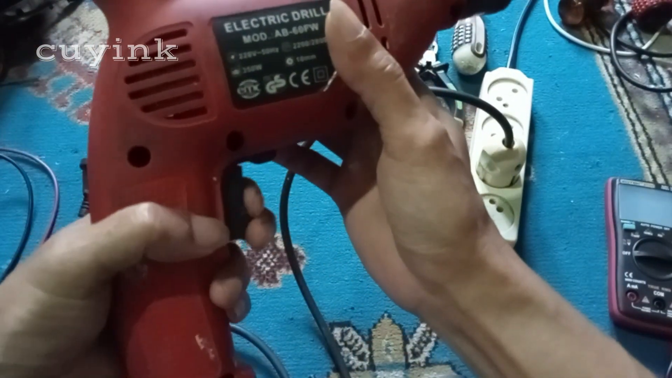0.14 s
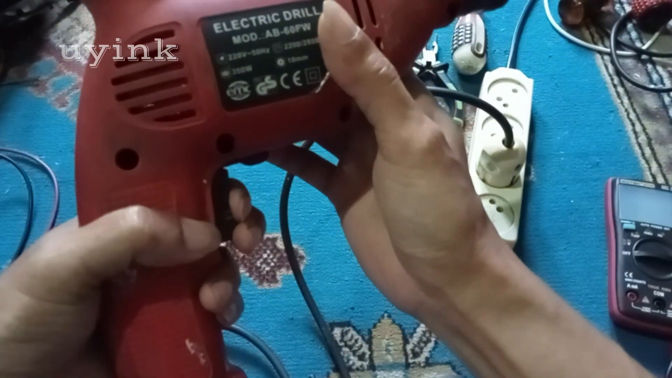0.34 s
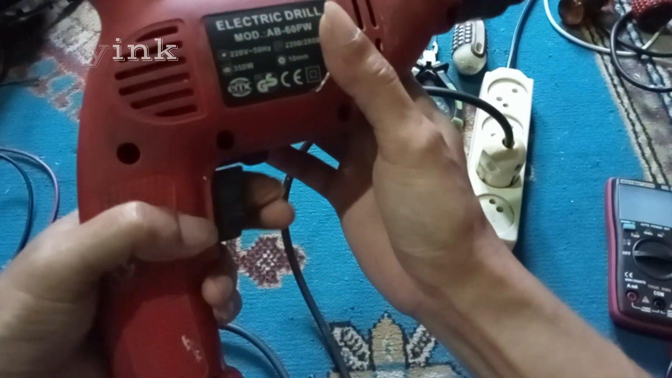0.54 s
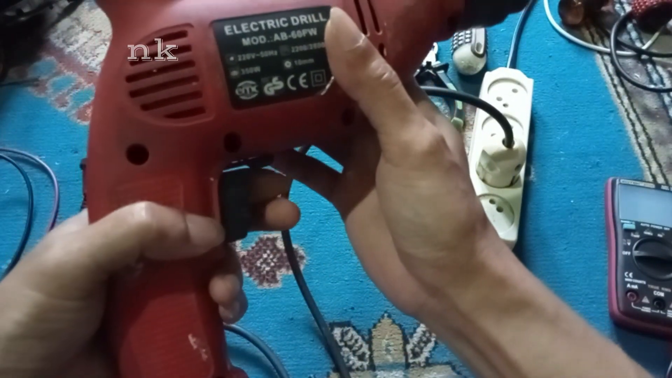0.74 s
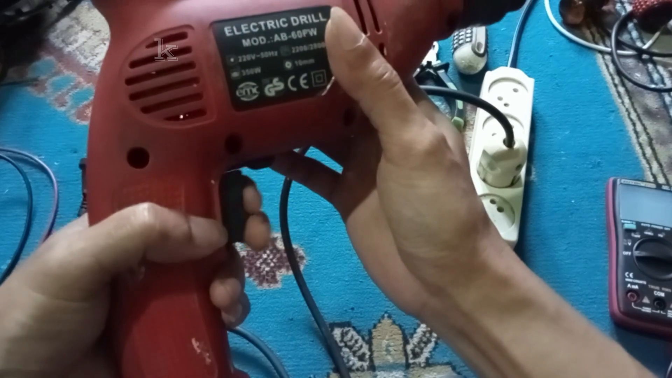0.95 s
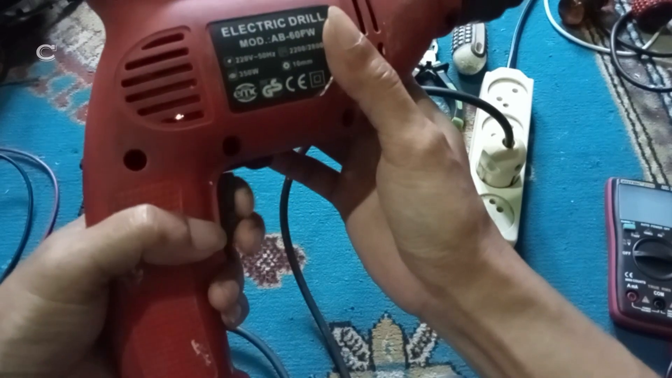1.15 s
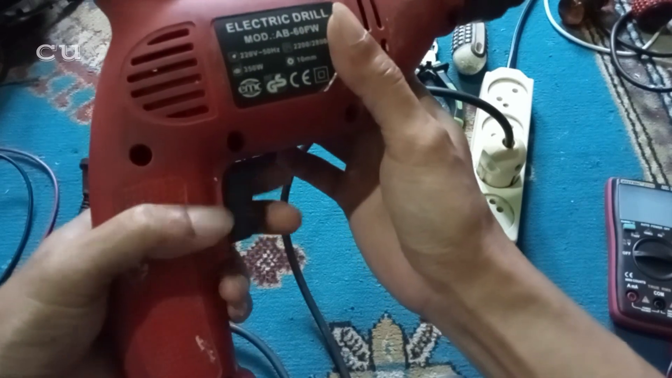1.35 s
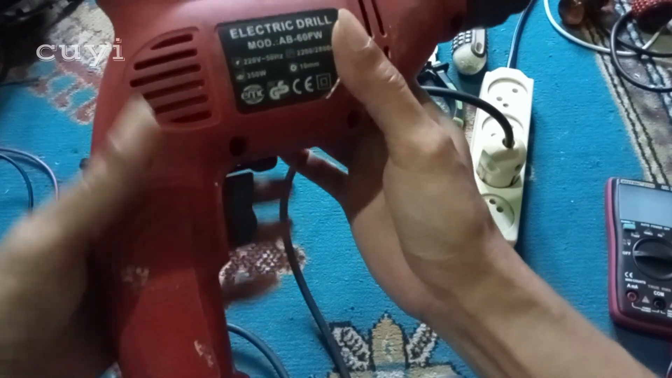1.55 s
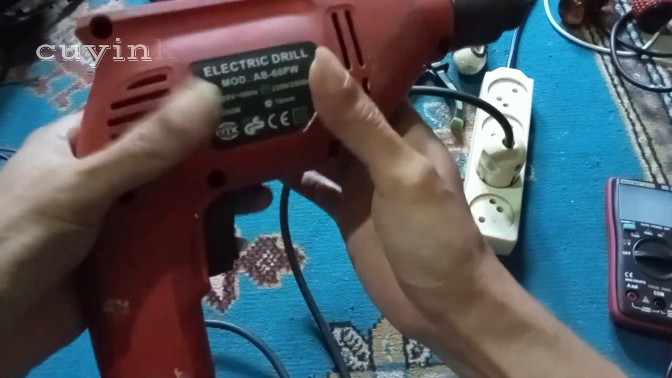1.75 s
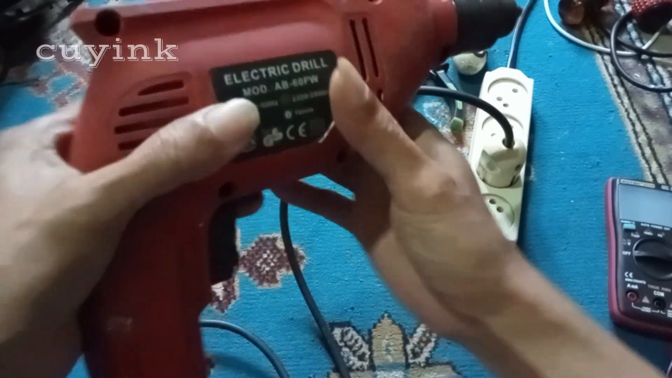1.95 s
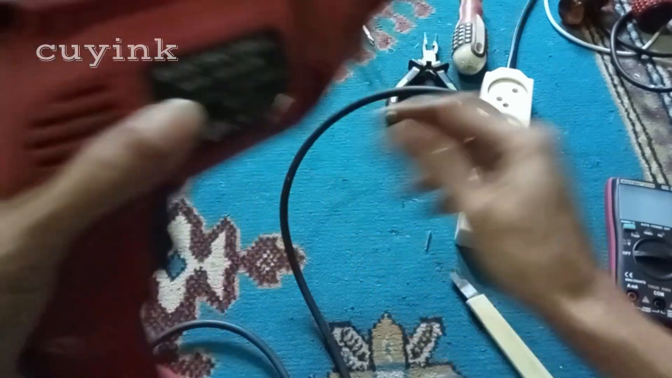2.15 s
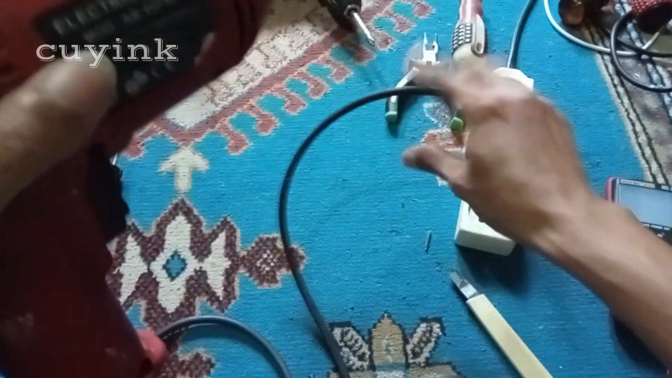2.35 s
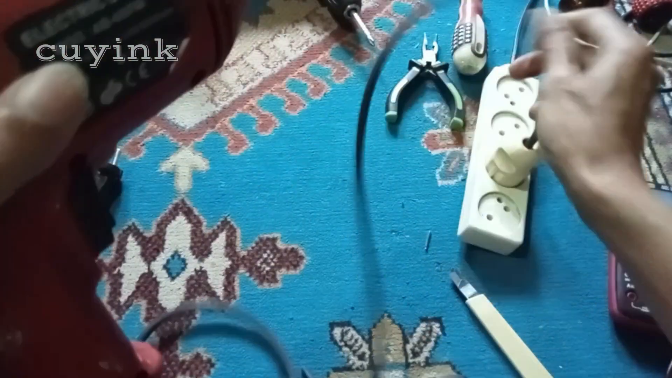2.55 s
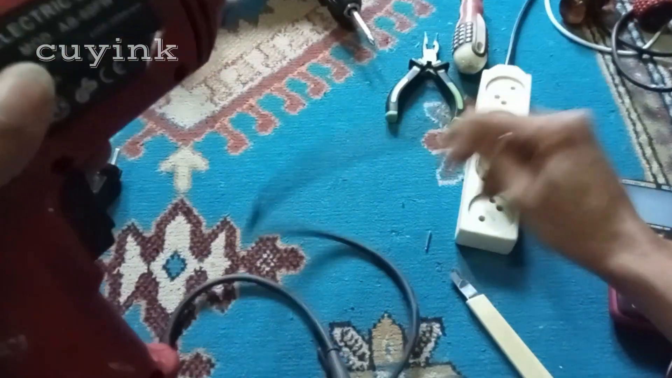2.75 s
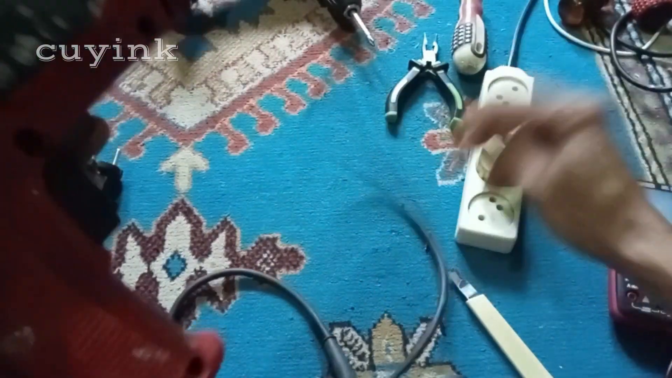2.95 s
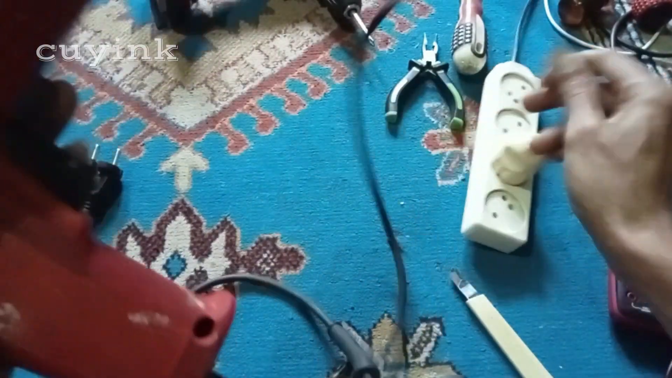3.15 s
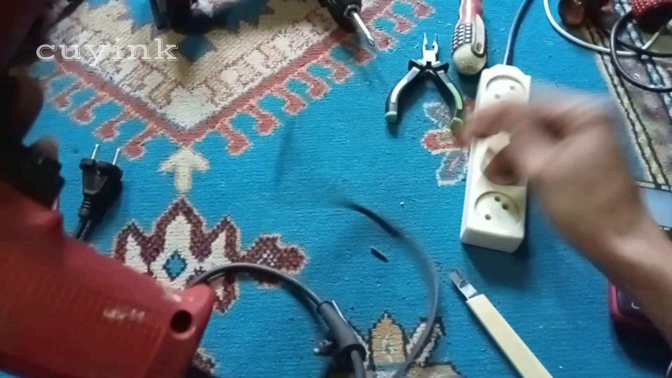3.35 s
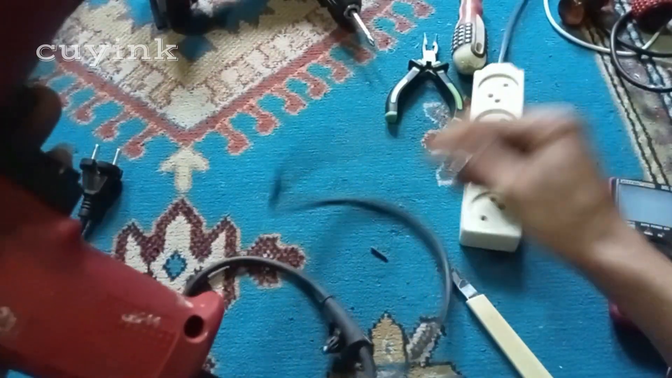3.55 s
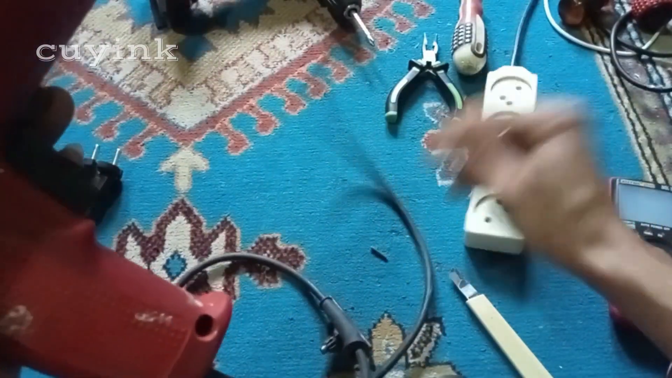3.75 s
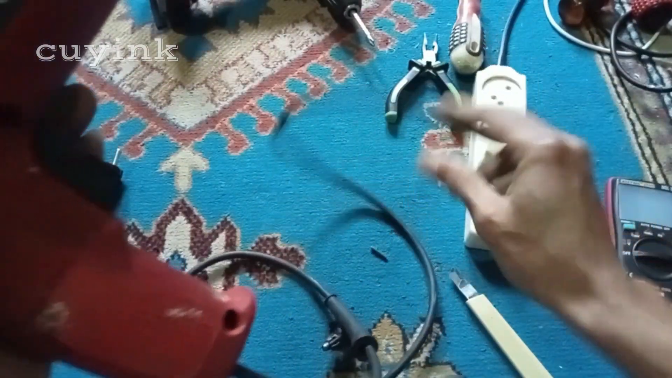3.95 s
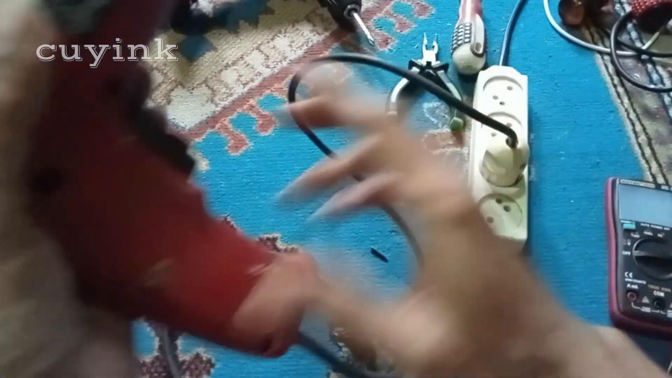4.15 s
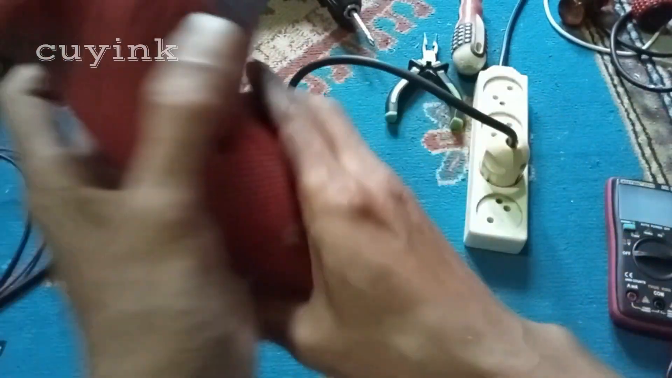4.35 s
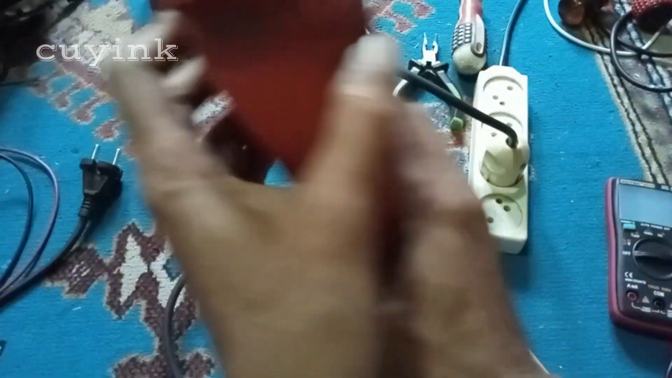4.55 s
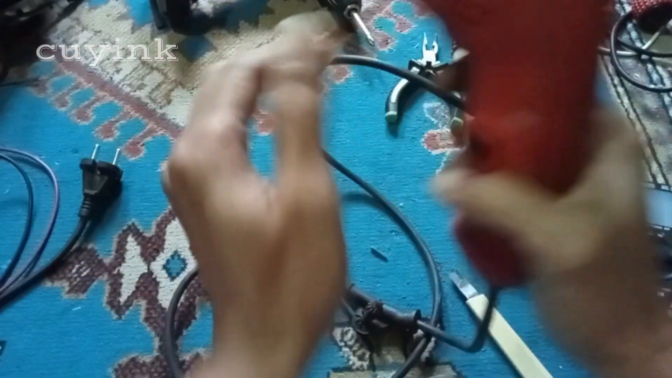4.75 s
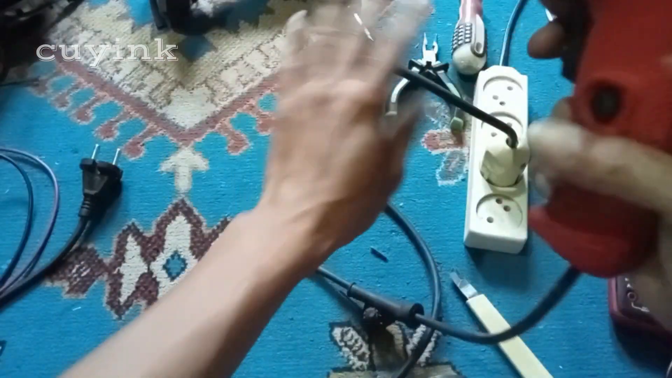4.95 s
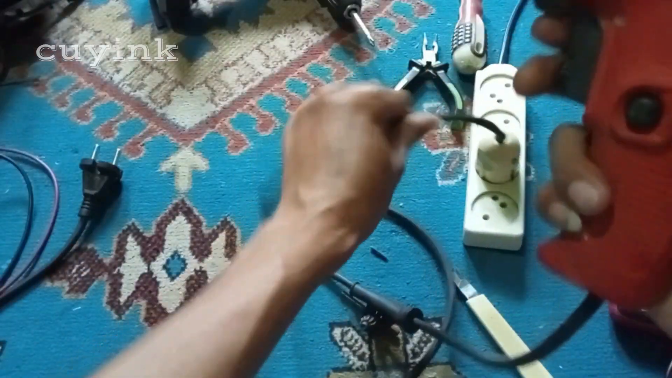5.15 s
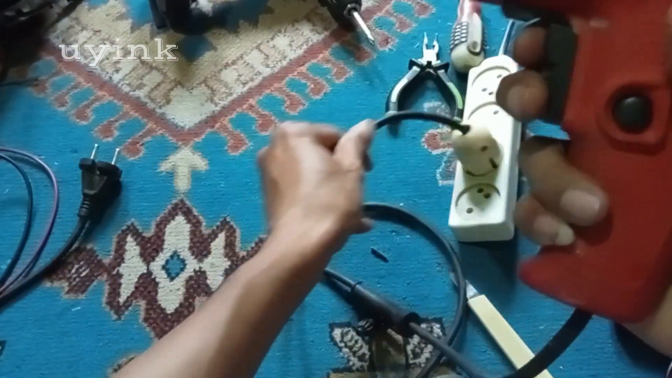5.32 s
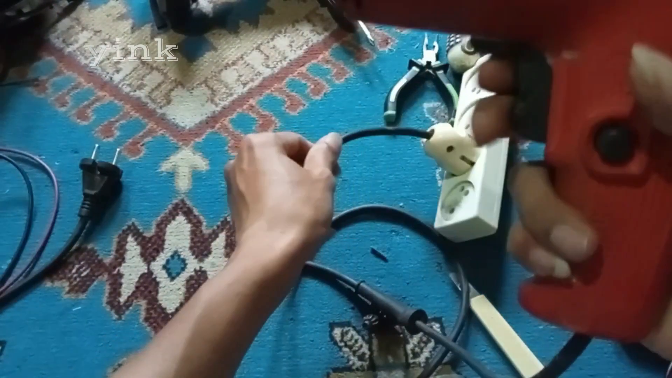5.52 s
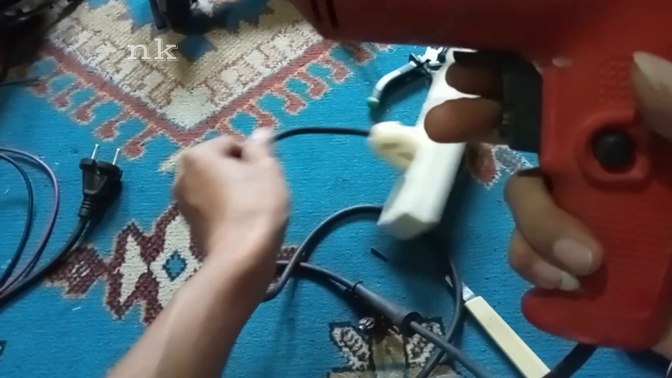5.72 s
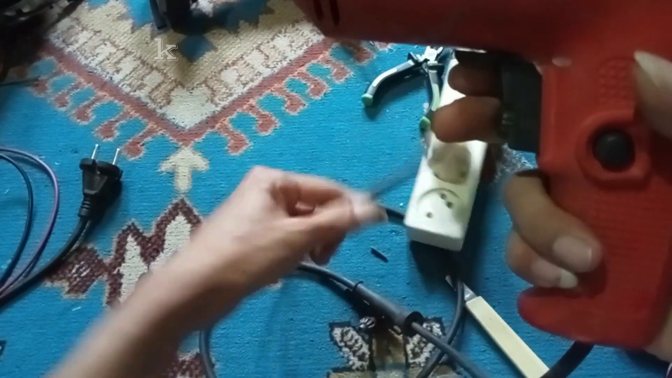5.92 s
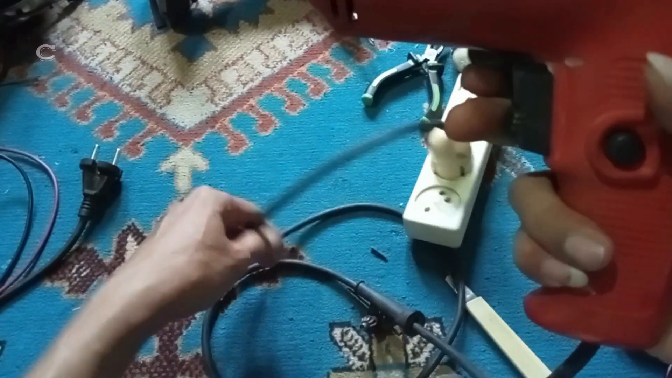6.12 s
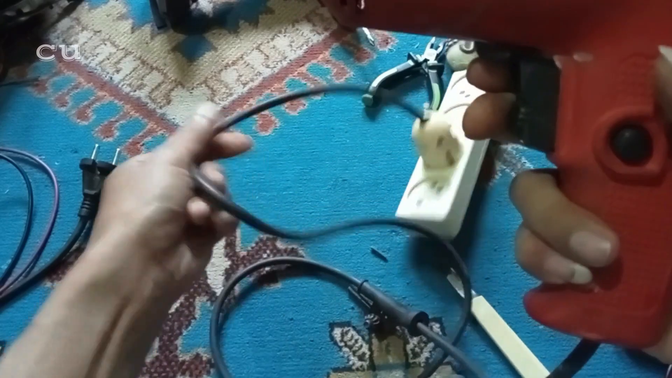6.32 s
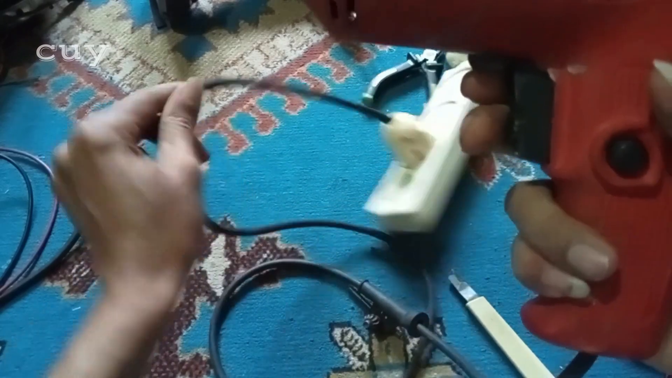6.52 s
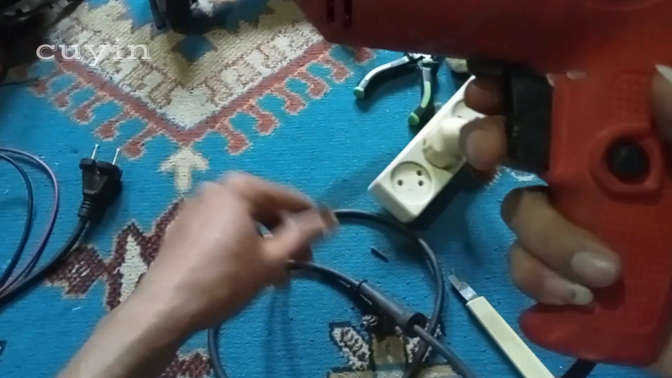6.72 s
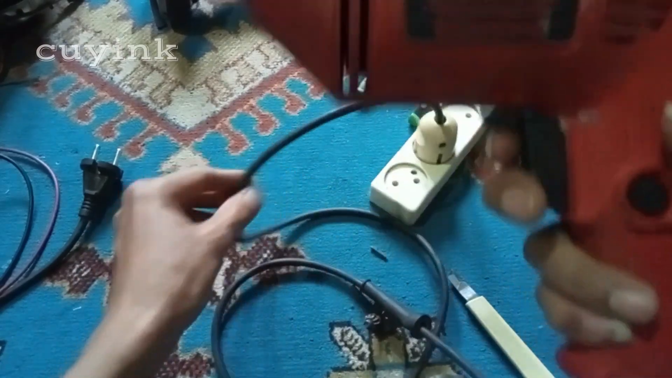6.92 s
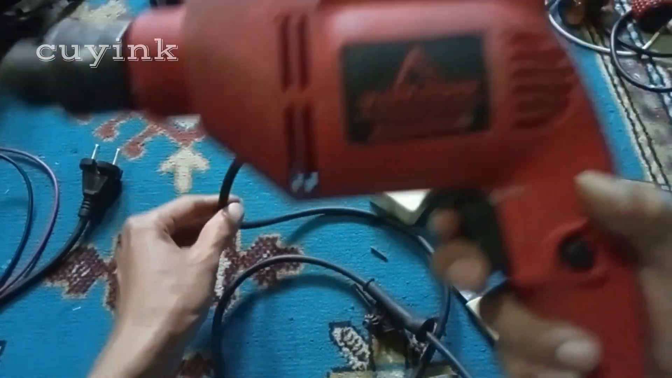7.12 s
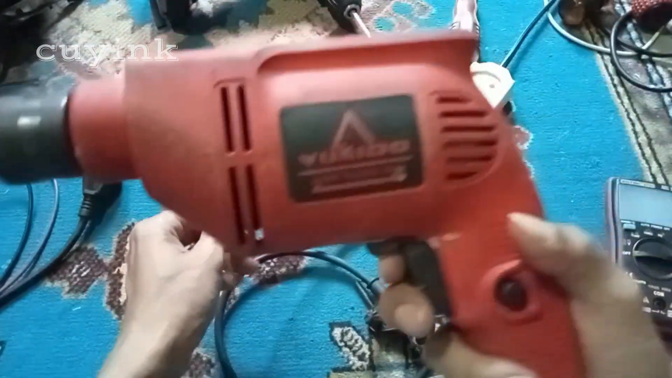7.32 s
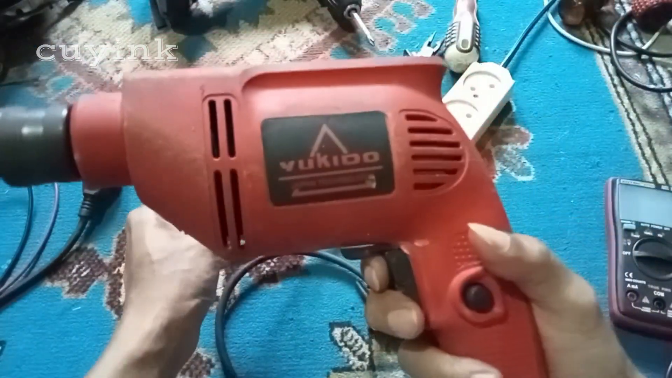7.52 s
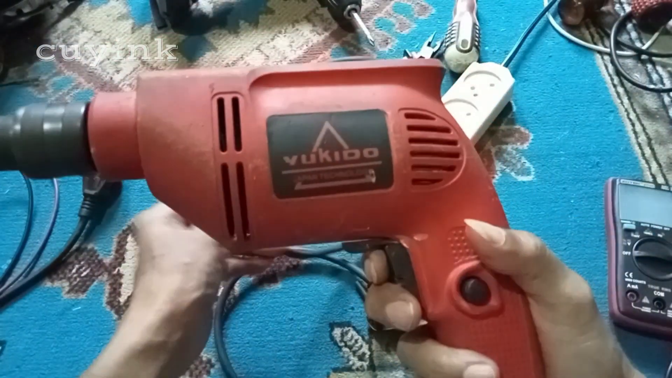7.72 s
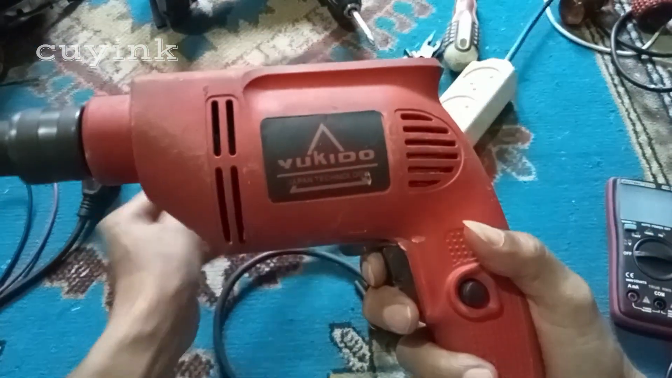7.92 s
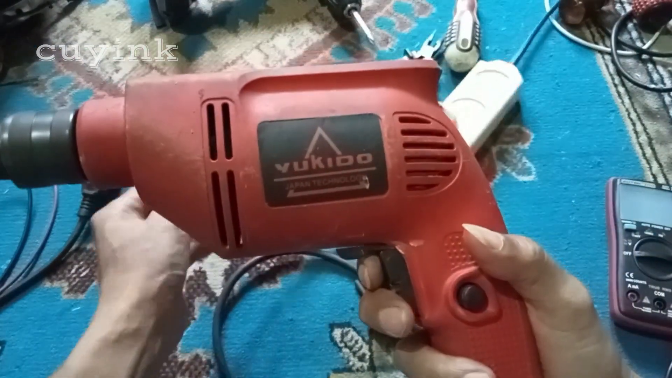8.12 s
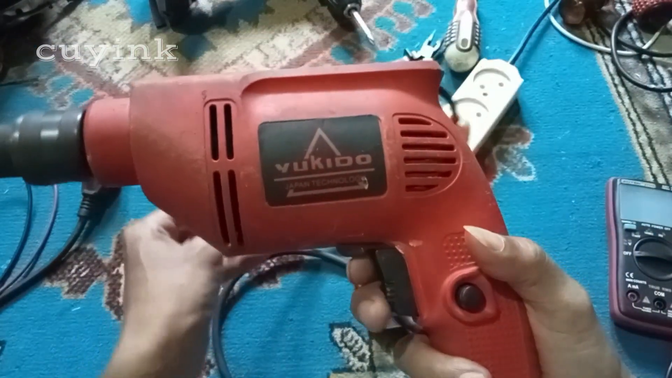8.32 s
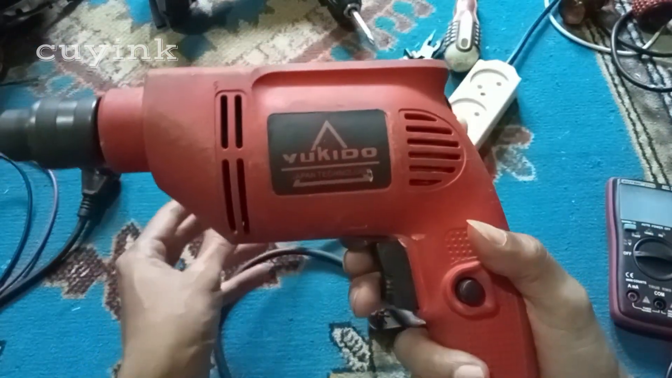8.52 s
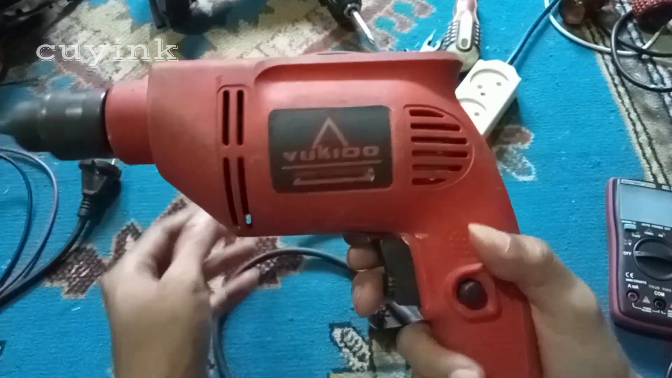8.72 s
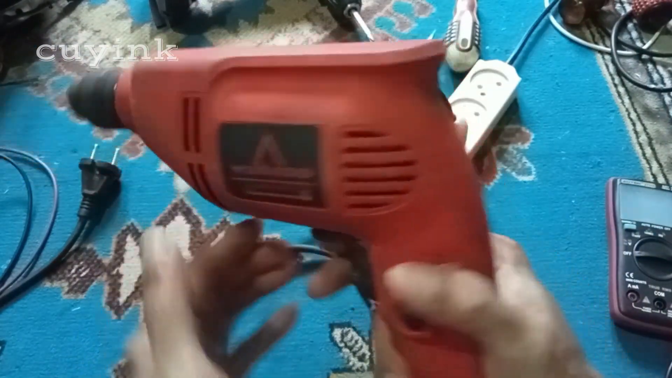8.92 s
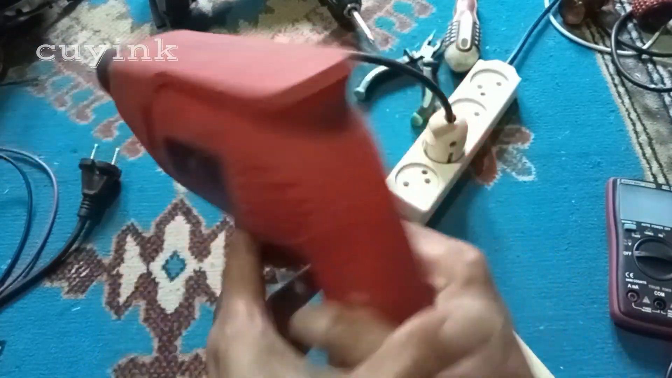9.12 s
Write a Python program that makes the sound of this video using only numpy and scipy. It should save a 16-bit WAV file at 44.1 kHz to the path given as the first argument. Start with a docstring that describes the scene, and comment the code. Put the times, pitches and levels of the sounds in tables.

```python
"""Electric drill in short bursts

A corded electric drill is held over a carpet in a small room and run four times without drilling.
Bursts of mains current spin the motor up; it then coasts down under friction, grease and fan drag.
Filtered noise makes its air, gear rattle and brush hiss; sine tones that follow its speed make the whine.
Decaying tones are thumps of cord and power strip, short noise bursts are plastic clicks.
Soft noise adds a knock's fading tail, sliding hands, a draught and the quiet room."""
import sys
import numpy as np
from scipy import signal
from scipy.fft import rfft, irfft, next_fast_len
from scipy.io import wavfile

SR = 44100
rng = np.random.default_rng(int(sys.argv[2]) if len(sys.argv) > 2 else 0)


def dump_mix(stems):
    """Bounce the given channels to the path in sys.argv[1] as a 16-bit WAV at rate SR."""
    frames = np.atleast_2d(stems).T  # one column per channel
    limited = np.clip(frames, -1, 1)  # hard clip at full scale
    pcm = np.round(limited * 32767).astype(np.int16)
    wavfile.write(sys.argv[1], SR, pcm)


N = 408807
TIME = np.arange(N) / SR   # s

# trigger squeezes: on t/s, off t/s, pull from standstill / turns per s per s
SQUEEZES = [(.251, .469, 4750), (.981, 1.24, 4175), (5.285, 5.606, 2201), (7.438, 8.401, 2397)]
# the stator sings under heavy current: start t/s, end t/s, rise t/s, fade t/s, level of the pull/dB,
# strength of the second mains half-wave (0-1), depth of the buzz (0-1)
BUZZES = [(0.262, .498, 0.048, .02, -21.5, 0.57, .2), (0.972, 1.204, .1, 0.13, -19, .6, 0.1),
          (5.282, 5.62, 0.13, 0.088, -28.5, 0.6, 0.9), (7.43, 7.9, 0.21, .47, -17.5, 0.27, 0.56)]
# laws of fan, gear and brush noise: label side level/dB and far side level/dB at full speed,
# growth/dB per tenfold speed (knee speed added), extra level/dB at standstill current
NOISE_LAWS = [(-36.5, -38, 58, 6), (-25.5, -24, 49, 3), (-24, -21, 70, 1.5)]
# the hand moves the drill's two ends nearer and farther: t/s, gearbox end level/dB, brush end level/dB
NEARNESS = [(0, 0, 2.5), (.25, 4, 3), (.33, -1.5, -0.5), (.5, 2, 1), (1.3, -0.5, .5), (1.75, -0.5, -2.5),
            (2.4, -2, 0), (3.45, -1, -6.5), (3.75, 0.5, 0), (5.45, 4.5, 3.5), (6.0, 3, 2.5), (6.9, 0.5, .5),
            (7.3, -1, 0.5), (7.55, 4.5, 5), (7.75, -1, -1.5), (8.25, -3.5, -3.5), (9.25, -5.5, -7.5)]
# colours of the running noise, gears and brushes from either side of the drill: f/Hz, level/dB
FAN_COLOUR = [(76, -40), (130, -18.5), (181, -12), (306, -5.5), (380, -2.5), (624, -4), (729, -1),
              (1150, -1), (1500, -26.5), (2530, -120)]
GEARS_LABEL_SIDE = [(620, -36), (1050, -11), (1200, -6.5), (1360, 2.5), (1550, 3.5), (1790, -5),
                    (2060, 3.5), (2250, -1), (2970, 1), (3240, -1.5), (4310, -0.5), (4900, 4), (5650, -4.5),
                    (6210, -3), (7000, -19.5), (9100, -38.5), (15400, -120)]
GEARS_FAR_SIDE = [(620, -16.5), (1050, -1.5), (1150, -3), (1540, 2), (1700, -2), (1970, 3), (2300, -1.5),
                  (2700, 3.5), (3070, -6.5), (3400, 4.5), (4050, 1), (4630, 5.5), (5690, 1.5), (6410, -3.5),
                  (7000, -37), (9100, -61), (15400, -120)]
BRUSHES_LABEL_SIDE = [(3880, -40), (6600, -12), (7170, -13), (7860, -8.5), (8300, -10.5), (8850, -3.5),
                      (9810, 1.5), (12500, -22), (14900, -16), (15500, -19.5)]
BRUSHES_FAR_SIDE = [(3880, -33), (6600, -9.5), (7480, -12), (8300, -10), (9640, 3), (10300, -0.5),
                    (11200, -10), (12400, -17.5), (14900, -11), (15500, -18.5)]
# ringing of the gearbox when loose teeth knock: f/Hz, width f/Hz, level/dB
GEARBOX = [(1547, 220, -2), (2224, 380, 4), (2943, 280, 3), (3247, 230, 2), (4610, 250, -13)]
# housing resonances that lift the rotor's tones: f/Hz, width f/Hz, level/dB
HOUSING = [(594, 170, 5), (780, 83, 9.5), (1477, 390, 15), (2110, 200, 6)]
# how the housing gives off the whine at six times the speed: f/Hz, level/dB
WHINE_LABEL_SIDE = [(250, -71), (570, -63), (870, -81), (1000, -42), (1260, -45.5), (1450, -37.5),
                    (1950, -46.5)]
WHINE_FAR_SIDE = [(290, -60), (450, -49), (620, -64), (900, -43.5), (1150, -50), (1550, -37.5), (1950, -54)]
# weaker tones of fan and pinion: multiple of the speed, level/dB at full speed, growth/dB per tenfold speed
ROTOR_TONES = [(2, -47, 59), (3, -50, 53.5), (4, -59.5, 56), (5, -52, 54.5), (7, -45.5, 51.5),
               (12, -51.5, 32), (18, -46, 36)]
# tones of the 24 commutator bars: multiple of the speed, level/dB before the treble tilt and the vents
BAR_TONES = [(24, -19.5), (48, -21), (72, -17), (96, -14), (120, -19), (144, -22), (168, -19)]
# the commutator whistle is beamed through the vents: t/s, level/dB towards the microphone
VENT_BEAM = [(.5, -13), (1.35, -2), (2.4, -4), (5.45, -1), (5.75, 2), (6.4, -4), (7.5, -1), (8.0, 12),
             (8.6, 7), (9.2, -12)]
# brush squeaks: start t/s, end t/s, first f/Hz, last f/Hz (both before a 0.96 scaling), level/dB
SQUEAKS = [(1.394, 1.581, 3130, 2960, -33), (3.573, 3.782, 389, 488, -56), (7.321, 7.45, 1590, 1460, -48)]
# plastic clicks and knocks: t/s, peak level/dB before the room, centre f/Hz, time to die by 60 dB t/s
CLICKS = [(0.183, -16.5, 2100, 0.014), (0.205, -19.5, 1950, 0.013), (3.014, -28, 1300, 0.012),
          (3.539, -37.5, 1190, 0.016), (3.772, -35, 800, .03), (3.881, -27, 1310, 0.0096),
          (3.883, -38.5, 1160, 0.024), (4.294, -48.5, 820, 0.032), (4.535, -54, 2580, 0.0095),
          (4.772, -40, 3500, 0.015), (5.271, -43, 3000, .015), (5.289, -29.5, 3400, .03),
          (5.324, -26, 3400, .025), (6.638, -22, 1300, 0.033), (6.654, -22, 840, 0.079)]
# resonances of the plastic shell: f/Hz, width f/Hz, level/dB
PLASTIC = [(788, 230, 8), (1362, 630, 6), (2375, 500, 2), (4870, 270, 10.5), (10100, 530, 11.5)]
# cord and power strip drop on the carpet: t/s, level/dB before a common 3 dB lift
THUMPS = [(2.681, -51), (2.809, -51), (2.996, -44), (3.088, -46), (3.253, -45), (3.365, -47), (3.639, -43),
          (3.984, -52), (4.029, -64), (6.02, -40.5), (6.369, -37.5), (6.584, -45), (6.652, -36.5),
          (6.813, -36.5), (8.038, -42)]
# tones in each thump: f/Hz, middle level/dB, time to die by 60 dB t/s
THUMP_MODES = [(124, -22.5, 0.11), (169.5, -0.5, 0.12), (218, -8, 0.07), (302, -11, 0.13)]
# soft rustles: the fading tail of a knock at 3.92 s, then hands sliding over housing and cord:
# loudest t/s, level/dB, rise t/s and fall t/s per 20 dB
RUSTLES = [(3.92, -68, 0.035, .11), (4.36, -69, 0.17, .14), (4.67, -63.5, 0.089, .1), (4.99, -70, .08, .07),
           (5.055, -60, .04, .04)]
# colours of the soft rustles, the draught and the quiet room: f/Hz, level/dB
RUSTLE_COLOUR = [(290, -39), (500, -11.5), (1720, -12), (2570, -9), (6270, -8), (8120, -14), (10100, 2),
                 (11800, -16.5), (15500, -17)]
DRAUGHT_COLOUR = [(21, -45), (35, -17.5), (81, 6.5), (161, -0.5), (190, 0), (250, -24.5), (420, -120)]
QUIET_COLOUR = [(25, -33.5), (42, -5), (90, 1), (215, -9.5), (429, -13.5), (498, -14), (4730, -21.5),
                (7760, -28.5), (9690, -19), (12100, -27.5), (15500, -26.5)]

QUIET_DB = -72
MAINS_HZ, FIRING_S = 49.95, .0035   # mains frequency and time shift of its wave
FULL_SPEED, KNEE_SPEED = 300, 107.7   # turns per s; below the knee the noise falls off more slowly
FIRST_SPEED, BACK_EMF_SPEED = 44, 141.8   # turns per s; at the start, and where current falls to 1/e
FRICTION, GREASE_DRAG, FAN_DRAG = 82.85, 50.85, 34.57   # braking at full speed, turns per s per s
GEAR_RATIO = 8   # rotor turns per chuck turn
TRIGGER_S = .02   # travel time of the switch
TURNED_S = 4.5   # the drill is turned from its label side to its far side
STOP_S, STOP_FADE_S = 3.765, .07   # the rotor comes to rest; fade per 20 dB
RESTART_S, RESTART_RISE_S = 5.284, .052   # it breaks loose again
SWING_S, SWING_FADE_S = 8.77, .65   # the drill is swung aside; its low tones fade per 20 dB
DRAUGHT_FROM_S, DRAUGHT_TO_S, DRAUGHT_DB = 1.83, 2.27, -46
DRAUGHT_RISE_S, DRAUGHT_FALL_S = .19, .07   # per 20 dB
CUTOFF_HZ = 15560


def trigger(on, off):
    """How far the switch is closed, 0-1."""
    return np.clip(np.minimum(TIME - on, off - TIME) / TRIGGER_S + .5, 0, 1)


def rotor_speed(size=44):
    """Turns per s: the motor pulls less the faster it turns; dry friction, grease and the fan brake it."""
    drive = sum(pull * trigger(on, off) for on, off, pull in SQUEEZES)[::size]
    speeds = [FIRST_SPEED]
    for pull in drive.tolist():
        speed = speeds[-1]
        share = speed / FULL_SPEED
        brake = FRICTION + GREASE_DRAG * share + FAN_DRAG * share ** 3
        gain = pull * np.exp(-speed / BACK_EMF_SPEED) - brake
        speeds.append(max(1, speed + gain * size / SR))
    return np.interp(np.arange(N) / size, np.arange(len(speeds)), speeds)


def turning():
    """1 while the rotor turns, faded towards 0 while it rests."""
    stopping = envelope(0, STOP_S, 1, STOP_FADE_S)
    restarting = np.clip((TIME - RESTART_S) / RESTART_RISE_S, 0, 1)
    return np.maximum(stopping, restarting)


def current(speed, sharpness=1.3, buzz_gain=0.86, uneven_db=1.0, take_up_s=.06):
    """One burst per mains half-wave gives the load, the magnetic pull and the shaking of the parts."""
    wave = np.cos(2 * np.pi * MAINS_HZ * (TIME - FIRING_S))
    strength = from_db(uneven_db * drift(40))   # sparking brushes make the bursts uneven
    load = sum(trigger(on, off) * np.clip((TIME - on) / take_up_s, 0, 1) for on, off, _ in SQUEEZES)
    load = load * np.exp(-speed / BACK_EMF_SPEED)   # eases as the rotor gets faster
    pull, shake = np.zeros(N), np.ones(N)
    for start, end, rise, fade, pull_db, second_half, depth in BUZZES:
        held = (TIME > start) * np.clip((end - TIME) / fade + .5, 0, 1)
        growing = np.clip((TIME - start) / rise, 0, 1) ** 2
        bursts = np.abs(wave) ** sharpness * np.where(wave > 0, 1, second_half)
        pull += held * growing * bursts * strength * from_db(pull_db)
        shake += held * depth * buzz_gain * (bursts - bursts.mean())
    return load, pull, shake


def noise_levels(speed, load, gear_end, brush_end):
    """Gains of fan, gears and brushes grow with speed, load and the nearness of their end of the drill."""
    decades = np.log10((speed + KNEE_SPEED) / (FULL_SPEED + KNEE_SPEED))
    gains = []
    for law, near in zip(NOISE_LAWS, (gear_end, gear_end, brush_end)):
        label_db, far_db, growth_db, load_db = law
        side_db = np.where(TIME < TURNED_S, label_db, far_db)
        gains.append(near * from_db(side_db + growth_db * decades + load_db * load))
    return gains


def rubbing(turns, per_turn_db, chuck_db, flutter_db, grain_db):
    """Grainy friction noise varies once per rotor turn and once per turn of the chuck."""
    rotor_swell = per_turn_db * np.cos(2 * np.pi * turns + .5 * drift(7.8))
    chuck_swell = chuck_db * np.cos(2 * np.pi * turns / GEAR_RATIO)
    chance = flutter_db * drift(48) + grain_db * drift(700)
    return rng.standard_normal(N) * from_db(rotor_swell + chuck_swell + chance)


def backlash(speed, knocks_per_turn=10.0, spread_db=3.5):
    """Unloaded teeth knock at random, more often at speed, and ring the gearbox; rms 1."""
    rate = knocks_per_turn * np.maximum(speed, 20)
    hits = (rng.random(N) < rate / SR) * rng.choice([-1, 1], N)
    knocks = hits * from_db(spread_db * rng.standard_normal(N)) / np.sqrt(rate)
    out = 0
    for hz, width, db in GEARBOX:
        ring = resonate(resonate(knocks, hz, width), hz, 2 * np.pi * width)
        out = out + from_db(db) * rms_one(ring)
    return rms_one(out)


def running_noise(speed, turns, fan, gears, brushes, ring_slow=.8, ring_fade_speed=110):
    """Air through the fan, rattle of the gears and hiss of the brushes are coloured rubbing noises."""
    air_rub = rubbing(turns, per_turn_db=-1.0, chuck_db=-1.0, flutter_db=1.5, grain_db=-2.5)
    teeth = rubbing(turns, per_turn_db=2.5, chuck_db=-0.2, flutter_db=0.76, grain_db=0.5)
    carbon = rubbing(turns, per_turn_db=1.5, chuck_db=0.13, flutter_db=1.0, grain_db=2.15)
    air = coloured(air_rub, FAN_COLOUR)
    label_side = TIME < TURNED_S
    roar = np.where(label_side, coloured(teeth, GEARS_LABEL_SIDE), coloured(teeth, GEARS_FAR_SIDE))
    hiss = np.where(label_side, coloured(carbon, BRUSHES_LABEL_SIDE), coloured(carbon, BRUSHES_FAR_SIDE))
    # as it slows, single knocks take over from the roar
    ringing = np.clip(ring_slow * np.exp(-speed / ring_fade_speed), 0, 1)
    rattle = np.sqrt(1 - ringing) * roar + np.sqrt(ringing) * backlash(speed)
    return fan * air + gears * rattle + brushes * hiss


def rotor_tones(speed, turns, far_side_db=-7.0, hum_db=-49, bass_cut_hz=170):
    """Low multiples of the speed swell as they glide through the housing's resonances."""
    hum = from_db(hum_db) / np.hypot(1, (bass_cut_hz / speed) ** 5)   # the hum fades steeply at low speed
    label = np.interp(6 * speed, *np.transpose(WHINE_LABEL_SIDE))
    far = np.interp(6 * speed, *np.transpose(WHINE_FAR_SIDE))
    whine = from_db(np.where(TIME < TURNED_S, label, far))
    side = from_db(far_side_db * (TIME > TURNED_S))
    out = hum * tone(turns, 1, rough=.2) + whine * tone(turns, order=6, rough=.9)
    for multiple, db, growth_db in ROTOR_TONES:
        level = from_db(db + growth_db * np.log10(speed / FULL_SPEED))
        level = level * lift(HOUSING, multiple * speed)
        out = out + side * level * tone(turns, multiple, rough=.6, waver_rate=27)
    return out


def commutator(speed, turns, bright_hz=15000, tilt=2.4):
    """The bars pass under the brushes and whistle, favouring the highest tones."""
    out = 0
    for multiple, db in BAR_TONES:
        hz = multiple * speed
        level = from_db(db) * (hz / bright_hz) ** tilt * (hz < .45 * SR)
        out = out + level * tone(turns, multiple, rough=.35)
    return out * from_db(in_time(VENT_BEAM)[0])


def magnetic_whine(speed, turns, pull, stator_hz=3200, stator_width_hz=1750,
                   slots_db=1, overtone_db=-1, jolt_db=-5.0):
    """Twelve armature slots tug at the stator under current; bursts also jolt the lowest gearbox mode."""
    slots = from_db(slots_db) * tone(turns, order=12, rough=0.43)
    slots = slots + from_db(overtone_db) * tone(turns, order=24, rough=.3)
    hz, width, _ = GEARBOX[0]
    jolt = rms_one(resonate(rng.standard_normal(N), hz, width))
    jolt = from_db(jolt_db) * jolt * speed / FULL_SPEED
    singing = resonate(pull * slots, stator_hz, stator_width_hz)
    singing = resonate(singing, stator_hz, stator_width_hz)
    return singing + pull * jolt


def squeaks():
    """The brushes give short rough chirps that glide in pitch, swell and fade."""
    out = 0
    for start, end, first_hz, last_hz, db in SQUEAKS:
        along = np.clip((TIME - start) / (end - start), 0, 1)
        cycles = np.cumsum(first_hz + (last_hz - first_hz) * along) / SR
        swell = np.sqrt(4 * along * (1 - along))
        out = out + from_db(db) * swell * tone(cycles, 0.96, rough=0.97)
    return out


def clicks(tail_db=-19, tail_t60=0.18):
    """Each contact is a short crack with a faint tail, coloured by its own pitch and the plastic shell."""
    out, t = np.zeros(N), TIME[:SR // 4]
    for s, db, hz, t60 in CLICKS:
        fading = from_db(-60 * t / t60) + from_db(tail_db - 60 * t / tail_t60)
        crack = resonate(rng.standard_normal(len(t)) * fading, hz, hz)
        shell = sum((from_db(gain) - 1) * resonate(crack, centre, width) for centre, width, gain in PLASTIC)
        crack = crack + shell
        at = round(s * SR)
        out[at:at + len(t)] += from_db(db) * crack / np.abs(crack).max()
    return out


def thumps(contact_s=0.0011):
    """Soft blows on the carpeted floor ring low and briefly."""
    out, t = np.zeros(N), TIME[:SR // 4]
    for s, db in THUMPS:
        ring = 0
        for hz, level, t60 in THUMP_MODES:
            strength = from_db(level + rng.normal(0, 2.7))   # each blow has its own mix
            ring = ring + strength * from_db(-60 * t / t60) * np.sin(2 * np.pi * hz * t)
        at = round(s * SR)
        out[at:at + len(t)] += from_db(db + 3.0) * ring * (1 - np.exp(-t / contact_s))
    return signal.sosfilt(signal.butter(2, 95, "high", fs=SR, output="sos"), out)


def rustles():
    """A knock's fading tail, then sliding hands: soft uneven noise that swells and fades."""
    swells = sum(from_db(db) * envelope(s, s, rise, fall) for s, db, rise, fall in RUSTLES)
    return swells * lumpy_noise(RUSTLE_COLOUR, lumpy_db=8.0)


def draught():
    """Air from the vents sweeps once across the microphone as a low, uneven rumble."""
    swell = envelope(DRAUGHT_FROM_S, DRAUGHT_TO_S, DRAUGHT_RISE_S, DRAUGHT_FALL_S)
    return from_db(DRAUGHT_DB) * swell * lumpy_noise(DRAUGHT_COLOUR, lumpy_db=3.5)


def room(x, wet_db=-13, t60=0.051):
    """Weak, quickly dying reflections of a carpeted room."""
    t = TIME[:SR // 4]
    echoes = rng.standard_normal(len(t)) * from_db(-60 * t / t60) * (t > .003)
    echoes = echoes / np.linalg.norm(echoes)
    return x + from_db(wet_db) * signal.fftconvolve(x, echoes)[:N]


def quiet_room():
    """Steady faint noise under everything."""
    return from_db(QUIET_DB) * coloured(rng.standard_normal(N), QUIET_COLOUR)


def from_db(db):
    """Decibels to gain."""
    return 10 ** (np.asarray(db) / 20)


def rms_one(x):
    """Scale to unit power."""
    return x / np.sqrt(np.mean(x ** 2) + 1e-20)


def in_time(rows):
    """One curve over time for each column after the first."""
    s, *columns = np.transpose(rows)
    return [np.interp(TIME, s, c) for c in columns]


def envelope(start, end, rise_s, fall_s):
    """Rise, hold and fall; each slope takes its given time to cover 20 dB."""
    early = np.maximum(start - TIME, 0) / rise_s
    late = np.maximum(TIME - end, 0) / fall_s
    return from_db(-20 * (early + late))


def drift(rate):
    """Smoothed chance with rms 1; a higher rate in Hz moves faster."""
    r = np.exp(-40 * np.pi * rate / SR)   # worked out at every 20th sample
    slow = signal.lfilter([1], [1, -2 * r, r * r], rng.standard_normal(N // 20 + 2002))[2000:]
    return np.interp(np.arange(N) / 20, np.arange(len(slow)), rms_one(slow))


def tone(turns, order, rough, waver_rate=45):
    """A multiple of the rotation whose strength and phase waver."""
    angle = 2 * np.pi * (order * turns + rng.random())
    steady = (1 + rough * drift(waver_rate)) * np.sin(angle)
    sideways = rough * drift(waver_rate) * np.cos(angle)
    return np.sqrt(2 / (1 + 2 * rough ** 2)) * (steady + sideways)


def filtered(x, response):
    """Apply a gain given as a function of frequency."""
    size = next_fast_len(N, real=True)
    hz = np.maximum(np.arange(size // 2 + 1) * SR / size, 1)
    return irfft(rfft(x, size) * response(hz), size)[:N]


def coloured(x, spectrum):
    """Give a noise a spectrum with steep skirts; rms 1."""
    hz, db = np.transpose(spectrum)

    def response(f):
        skirts = np.minimum(1, np.minimum(f / hz[0], hz[-1] / f)) ** 8
        return skirts * from_db(np.interp(np.log(f), np.log(hz), db))
    return rms_one(filtered(x, response))


def lumpy_noise(colour, lumpy_db):
    """Coloured noise of uneven strength; rms 1."""
    return coloured(rng.standard_normal(N) * from_db(lumpy_db * drift(50)), colour)


def lift(resonances, hz):
    """Gain of a body at a frequency: near 1, raised around each resonance."""
    return from_db(sum(db / (1 + (2 * (hz - centre) / width) ** 2) for centre, width, db in resonances))


def resonate(x, hz, width):
    """A resonance with gain of about 1 at its peak."""
    r = np.exp(-np.pi * width / SR)
    feed = np.array([1, 0, -1]) * (1 - r * r) / 2
    back = [1, -2 * r * np.cos(2 * np.pi * hz / SR), r * r]
    return signal.lfilter(feed, back, x + 1e-18)


def scene():
    """The drill's running sounds follow the rotor; one microphone feeds both channels."""
    speed = rotor_speed()
    turns = np.cumsum(speed) / SR
    load, pull, shake = current(speed)
    gear_end, brush_end = from_db(in_time(NEARNESS)) * turning()
    fan, gears, brushes = noise_levels(speed, load, gear_end, brush_end)
    noise = shake * running_noise(speed, turns, fan, gears, brushes)
    low_tones = turning() * envelope(0, SWING_S, 1, SWING_FADE_S) * rotor_tones(speed, turns)
    whistle = brushes * commutator(speed, turns)
    tones = low_tones + whistle + magnetic_whine(speed, turns, pull) + squeaks()
    mix = room(noise + clicks()) + tones + thumps() + rustles() + draught() + quiet_room()
    return np.tile(mix, (2, 1))


def record(dry):
    """The top is cut steeply, over 120 Hz around the cutoff."""
    def top_cut(f):
        return np.clip((CUTOFF_HZ - f) / 120 + .5, 0, 1)
    return np.array([filtered(channel, top_cut) for channel in dry])


dry = scene()
out = record(dry)
dump_mix(out)
```